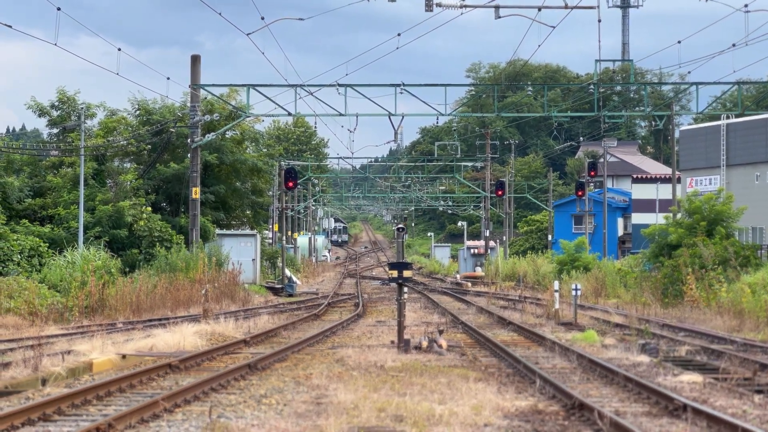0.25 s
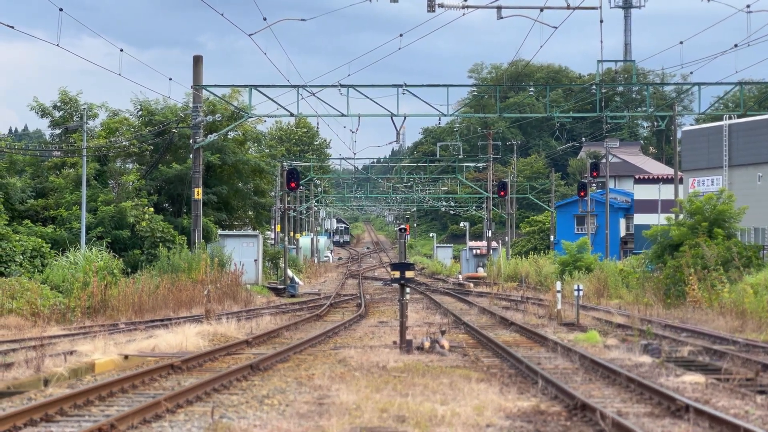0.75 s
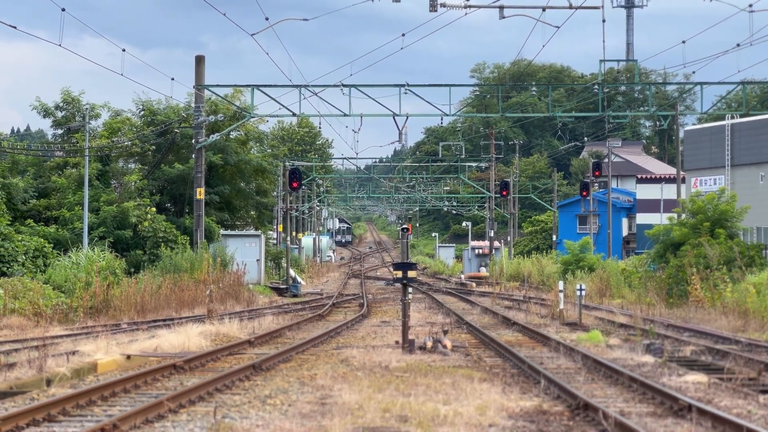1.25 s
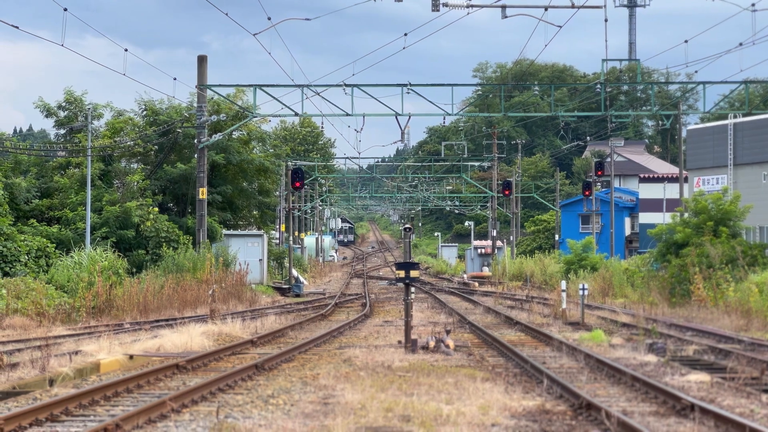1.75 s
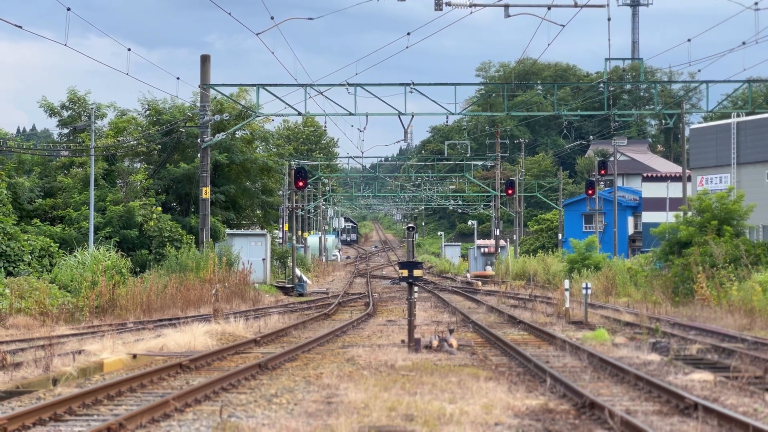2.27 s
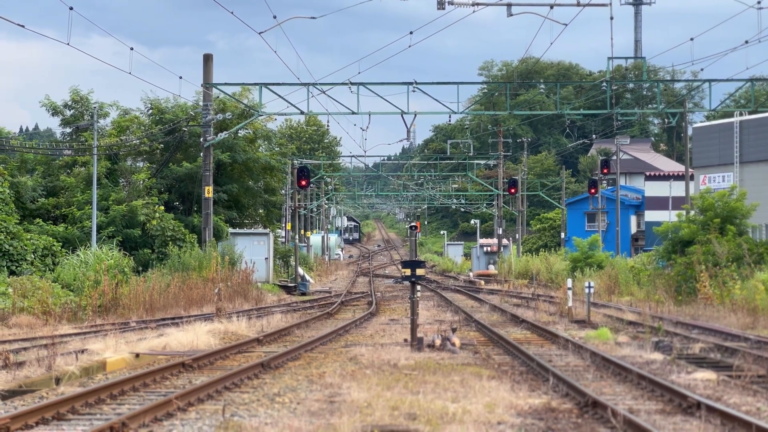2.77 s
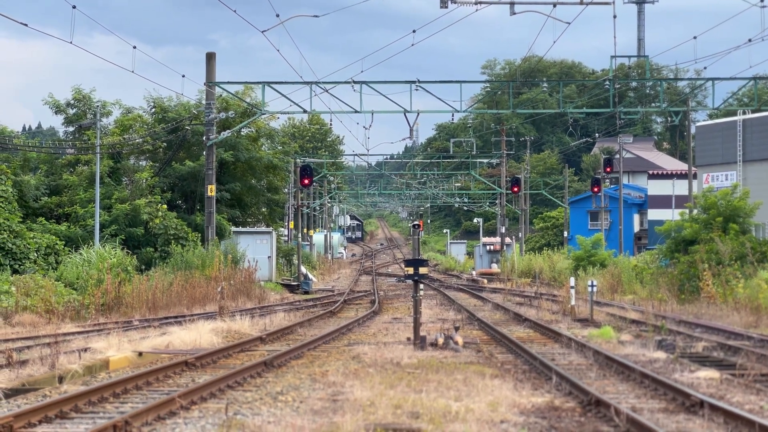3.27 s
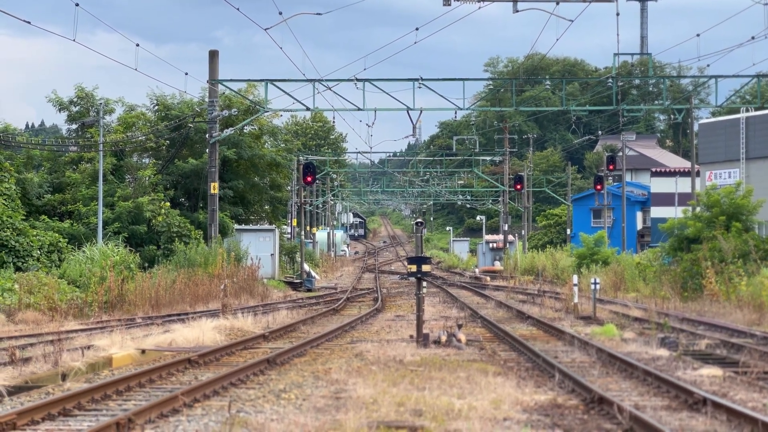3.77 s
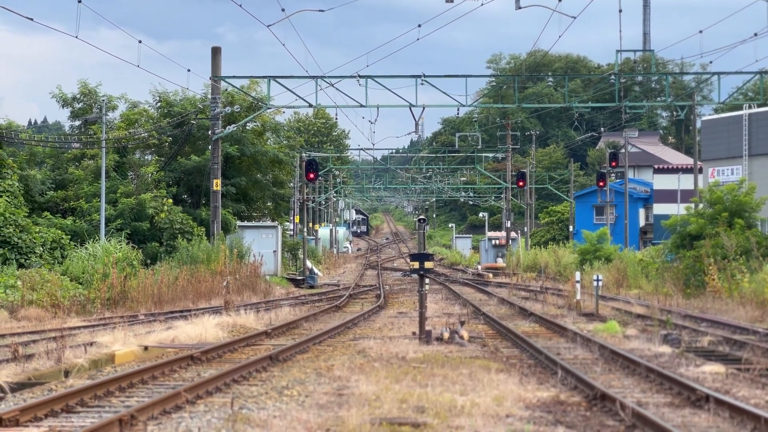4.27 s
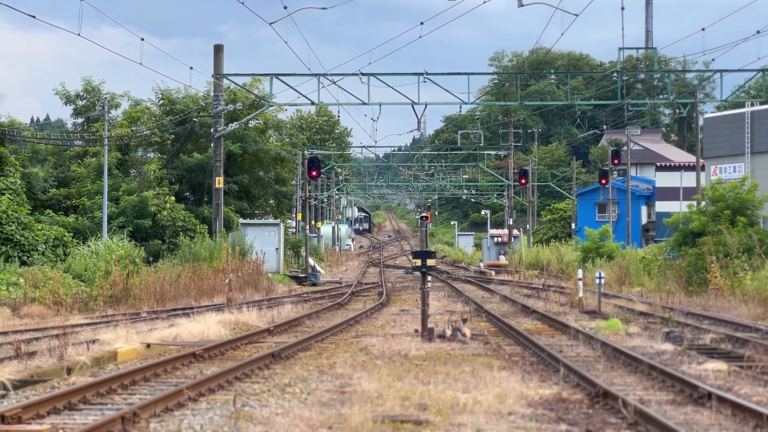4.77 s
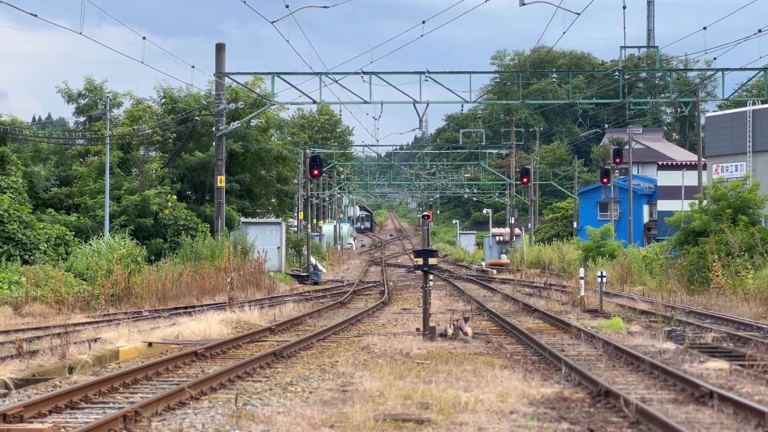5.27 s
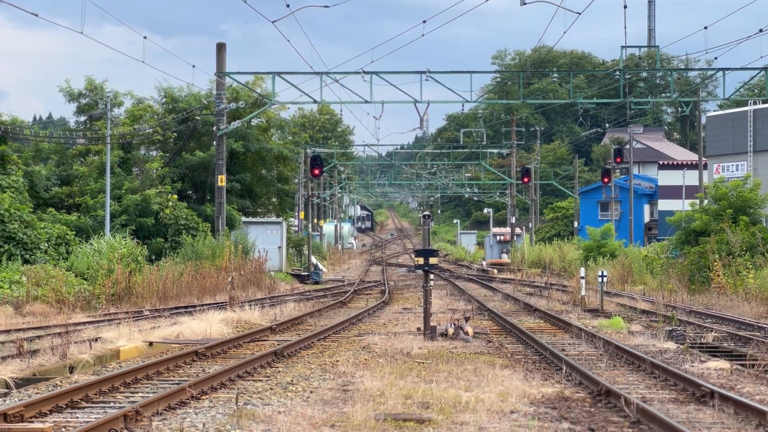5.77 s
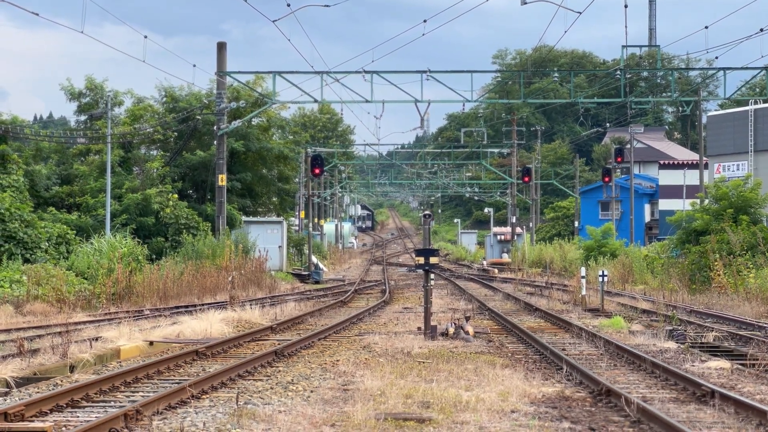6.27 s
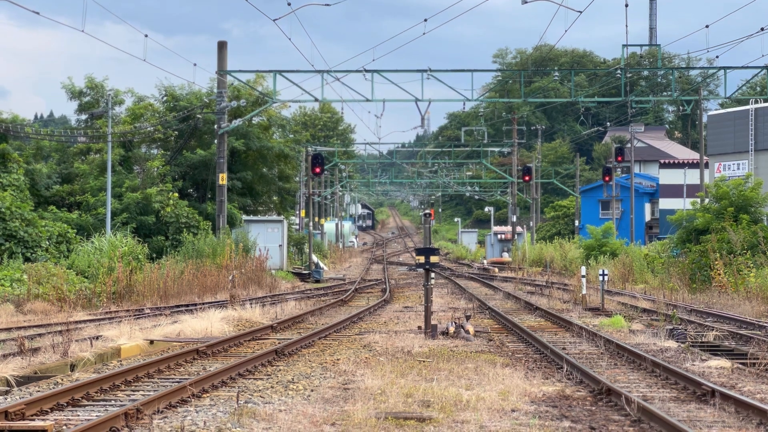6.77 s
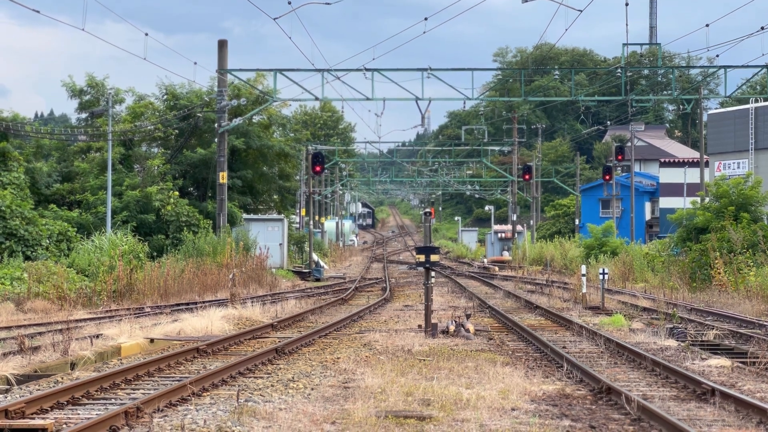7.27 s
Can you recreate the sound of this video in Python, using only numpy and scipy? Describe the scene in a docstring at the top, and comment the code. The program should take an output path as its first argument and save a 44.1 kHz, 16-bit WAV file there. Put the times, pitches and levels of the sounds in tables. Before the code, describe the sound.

Outdoors by railway tracks, a wide, high hiss of massed cicadas carries on throughout, with closer ones buzzing and pulsing in it. Light wind rumble on the microphone swells into three bouts of irregular puffs and low buffeting, with calmer gaps between them. Far behind, traffic and machinery blur into a soft steady roar with a faint hum that comes and goes.

```python
"""Cicadas shrill in the trees around a rail yard, their clicking tymbals ringing their abdomens.
A far chorus merges into a hiss; three singers sit nearer, and a fourth throbs in syllables.
Wind buffets the microphone in gusts and puffs. Distant traffic and machinery, a low hum, crickets
and two faint notes fill the middle. Both channels carry almost the same sound, turned in phase."""
import sys
import numpy as np
from scipy import signal
from scipy.fft import rfft, irfft, next_fast_len
from scipy.io import wavfile

SR = 44100
rng = np.random.default_rng(int(sys.argv[2]) if len(sys.argv) > 2 else 0)


def generate_wav(sig):
    """Save sig (samples, or channels by samples) to the path in sys.argv[1] as 16-bit PCM at SR."""
    pcm = np.round(np.clip(np.atleast_2d(sig).T, -1, 1) * 32767).astype(np.int16)
    wavfile.write(sys.argv[1], SR, pcm)


N = 332052
SIZE = next_fast_len(N)
HZ = np.maximum(np.fft.rfftfreq(SIZE, 1 / SR), 1)

# single eddies hitting the microphone: (time [s], push [dB], tick over push [dB], wake rumble [dB])
WIND_PUFFS = [(.16, -39, -6.5, -51), (0.802, -43, 6.5, -52), (1.088, -52, -2, -46), (2.023, -50, 9.5, -71),
              (2.066, -41, -12.5, -54), (2.352, -30.5, -24, -33.5), (2.403, -43, -28, -36),
              (2.449, -40, -19, -28), (2.544, -44, -34, -26.5), (2.607, -30, -33, -37),
              (2.642, -45, -21, -33), (2.735, -29, -23, -29.5), (2.766, -17.5, -32, -26),
              (2.818, -40, -20, -30.5), (2.88, -47, -15, -32), (2.934, -21.5, -19, -32),
              (3.014, -40.5, -15, -53), (3.079, -33.5, -6, -41), (4.18, -37, -10, -41.5),
              (4.39, -41, -8, -42.5), (4.641, -32, -13, -35.5), (4.859, -28.5, -1, -37.5),
              (4.947, -36, -1.5, -41.5), (4.983, -22.5, -3, -44), (5.012, -24.5, -12, -35),
              (5.04, -49, -5, -45), (5.18, -26, 1, -33.5), (5.226, -22, 0, -37), (5.281, -25.5, 2, -36),
              (5.32, -21, -4, -32), (5.353, -39, 0, -45), (5.466, -28.5, 0, -37.5),
              (5.509, -28, -22, -39.5), (5.54, -40, -6, -35), (5.611, -45, -16, -43),
              (6.135, -49, -16, -49), (6.176, -34, -6, -44), (6.745, -37, -4.5, -47.5),
              (6.819, -45, -10, -42.5), (6.883, -33, -6, -52), (6.941, -41, -13, -58),
              (7.026, -24.5, -6, -29), (7.054, -19, -12, -41), (7.085, -28, -12, -37),
              (7.194, -19.5, -24, -54), (7.2, -20, -7, -26.5), (7.235, -27, 3.5, -36), (7.285, -30, 9, -26),
              (7.343, -25.5, 3, -32), (7.372, -23.5, -2.5, -34), (7.417, -16, -6.5, -42)]


def amp(db):
    """Decibels to gain."""
    return 10 ** (np.asarray(db) / 20)


def rms_one(x):
    """Scale to rms 1."""
    return x / np.sqrt(np.mean(x ** 2) + 1e-20)


def in_time(rows):
    """The value columns of a (time, values...) table at every sample."""
    s, *columns = np.transpose(rows)
    return [np.interp(np.arange(N) / SR, s, c) for c in columns]


def at_hz(points):
    """A (frequency, value) table at every FFT bin."""
    hz, value = np.transpose(points)
    return np.interp(np.log(HZ), np.log(hz), value)


def shaped(x, response):
    """Filter by a frequency response."""
    return irfft(rfft(x, SIZE) * response, SIZE)[..., :N]


def peak(hz, width_hz):
    """Response of a causal resonance, gain 1 on top."""
    return 1 / (1 + 1j * (HZ - hz ** 2 / HZ) / width_hz)


def band(low_hz, high_hz, order):
    """Response of a causal band-pass."""
    sos = signal.butter(order, [low_hz, high_hz], "band", fs=SR, output="sos")
    return signal.sosfreqz(sos, HZ, fs=SR)[1]


def drift(rate_hz):
    """Random wander of rms 1, mostly slower than rate_hz."""
    return rms_one(shaped(rng.standard_normal(N), 1 / (1 + (HZ / rate_hz) ** 2)))


def far_chorus(level_db=-46.5, treble_hz=10500):
    """So many distant cicadas that their clicks merge into a hiss, which swells a little."""
    # spectrum of the massed song: (frequency [Hz], relative density [dB])
    spectrum = [(3000, -22.5), (3600, -28), (4200, -16.5), (4800, -8), (5050, -3.5), (6000, -2.5),
                (7000, -3), (7600, -1), (8200, -4.5), (8800, -7.5), (9400, -7.5), (10000, -16),
                (10500, -19.5), (10900, -18.5), (11500, -13), (12200, -10.5), (13200, -10), (14500, -10),
                (15200, -13), (15900, -12.5)]
    # the treble ebbs toward the end: (time [s], gain above treble_hz [dB])
    treble_ebb = [(0, 0.5), (3.5, 0), (4.1, 0), (5.4, 0.5), (6.3, 0), (7.53, -1.5)]
    hiss = rms_one(shaped(rng.standard_normal(N), amp(at_hz([(2000, -50)] + spectrum))))
    treble_change = shaped(hiss, HZ > treble_hz) * (amp(in_time(treble_ebb)[0]) - 1)
    return amp(level_db + .45 * drift(6.3)) * (hiss + treble_change)


def tymbal_envelope(clicks_per_s, decay):
    """The tymbal buckles at a slightly wandering rate; each click dies away over its cycle."""
    cycle = np.cumsum(clicks_per_s * (1 + .012 * drift(.94))) / SR % 1
    return np.exp(-decay * cycle)


def cicada(song, width_hz, clicks_per_s, decay):
    """Click bursts ring the abdomen: a narrow noise band carried on the song's pitch."""
    hz, level_db = in_time(song)
    bursts = rng.standard_normal((2, N)) * tymbal_envelope(clicks_per_s, decay)
    ring = shaped(bursts, 1 / (1 + (2 * HZ / width_hz) ** 3))
    carrier = np.exp(2j * np.pi * np.cumsum(hz) / SR)
    return amp(level_db) * rms_one(((ring[0] + 1j * ring[1]) * carrier).real)


def near_cicadas(steady_hz=8323):
    """Three singers in the nearer trees: one holds its pitch, one wanders, one rings thinly."""
    # steady singer, fading while the wanderer sings and then returning: (time [s], level [dB])
    steady_levels = [(0, -48.5), (1.3, -50.5), (2.4, -52.5), (3.1, -52.5), (3.45, -49), (4.2, -49),
                     (4.8, -47), (5.5, -49), (7.1, -47), (7.53, -49)]
    # wandering singer: (time [s], pitch [Hz], level [dB])
    wandering_song = [(0, 7800, -56.5), (.35, 7700, -56.5), (.6, 7050, -58), (.9, 7100, -55.5),
                      (1.2, 7200, -62), (1.6, 7300, -58.5), (1.9, 6900, -65), (2.1, 6550, -59),
                      (2.55, 6500, -56.5), (3.2, 6600, -62), (3.35, 6700, -80)]
    # thin ringing singer: (time [s], pitch [Hz], level [dB])
    thin_song = [(0, 5130, -70), (1.5, 5090, -64), (2.2, 5100, -61), (3.6, 5050, -65.5), (7.53, 5090, -64)]
    steady_song = [(s, steady_hz, db) for s, db in steady_levels]
    return (cicada(steady_song, width_hz=1300, clicks_per_s=399, decay=1.3)
            + cicada(wandering_song, width_hz=240, clicks_per_s=510, decay=.6)
            + cicada(thin_song, width_hz=51, clicks_per_s=391, decay=.29))


def syllables(period_s=.061, swell_db=9.5, uneven_s=.003, uneven_db=1):
    """Times and levels of the throbbing cicada's syllables; each phrase grows to its middle and sinks."""
    # phrases of the song: (first syllable [s], syllables [count], peak level [dB])
    phrases = [(-.08, 9, -52.5), (.505, 7, -53), (.985, 8, -52.5), (1.59, 8, -55), (2.23, 9, -52.5),
               (2.778, 3, -54), (3.066, 10, -52), (3.66, 7, -55), (4.26, 8, -53), (4.83, 7, -53.5),
               (5.254, 6, -46), (5.616, 7, -48), (6.045, 2, -56), (6.288, 6, -55), (6.652, 5, -54),
               (7.008, 10, -50.5)]
    rows = [(s + k * period_s, peak_db - swell_db * ((2 * k + 1) / count - 1) ** 2)
            for s, count, peak_db in phrases for k in range(count)]
    return (rows + rng.standard_normal((len(rows), 2)) * [uneven_s, uneven_db]).T


def throbbing_cicada(syllable_s=.044):
    """Each syllable is a run of clicks through the body's resonances that swells and stops short."""
    # body resonances: (frequency [Hz], width [Hz], relative gain [dB])
    resonances = [(5390, 1570, -3.5), (13900, 2900, -2), (15340, 1600, -11), (15600, 2900, -22)]
    s, level_db = syllables()
    heard = (s >= 0) & (s < N / SR)
    starts = np.zeros(N)
    starts[(s[heard] * SR).astype(int)] = amp(level_db[heard])
    progress = np.arange(int(syllable_s * SR)) / (syllable_s * SR)
    envelope = signal.fftconvolve(starts, np.sin(np.pi * progress ** 1.4) ** .4)[:N]
    clicks = rng.standard_normal(N) * tymbal_envelope(clicks_per_s=391, decay=.57)
    body = sum(amp(db) * peak(hz, width_hz) ** 2 for hz, width_hz, db in resonances)
    return envelope * rms_one(shaped(clicks, body))


def wind(lag_hz=131):
    """Eddies roll over the microphone port: lumpy rumble, thumps, a brighter flutter and single puffs."""
    # wind between the puffs: (time [s], rumble [dB], thumps over rumble [dB], flutter over rumble [dB])
    gusts = [(0, -48, -12.5, -18), (2.33, -49.5, -14.5, -14), (2.37, -40, -57, -34), (2.9, -44.5, -29, -33),
             (3.15, -55.5, -12, -7.5), (3.7, -63, -16, -13), (4.2, -46.5, -15.5, -22),
             (4.45, -51, -12.5, -26), (4.56, -52.5, -9, -14), (5.12, -53.5, -15, -14),
             (5.2, -41, -5.5, -14), (5.6, -46.5, -31, -20), (5.75, -57, -18.5, -21.5),
             (6.6, -55.5, -5, -10), (6.95, -46, -8.5, -16), (7.16, -44.5, -12, -25),
             (7.21, -38.5, -6.5, -13.5), (7.53, -35.5, -13.5, -15)]
    rumble_db, thump_db, flutter_db = in_time(gusts)
    lumps_db, swell_db = 2.42 * drift(40), 2 * drift(2.5)
    noise = rng.standard_normal(N)
    level = np.hypot(amp(rumble_db + swell_db), wakes())
    rumble = rms_one(shaped(noise, band(42.2, 106.3, order=2))) * amp(.51 * lumps_db)
    thumps = rms_one(shaped(noise, band(79.4, 261.5, order=3))) * amp(thump_db + lumps_db)
    flutter = rms_one(shaped(noise, band(262, 677, order=2))) * amp(flutter_db + 1.57 * lumps_db)
    buffets = level * (rumble + thumps + flutter) + puffs()
    # the lows come late, so that every buffet sweeps downward
    swept = shaped(buffets, ((lag_hz - 1j * HZ) / (lag_hz + 1j * HZ)) ** 2)
    return signal.sosfilt(signal.butter(4, 720, fs=SR, output="sos"), swept)


def far_machinery(level_db=-58.5):
    """Traffic and machinery across the yard blur into a gently wavering roar."""
    # spectrum of the roar: (frequency [Hz], relative density [dB])
    spectrum = [(88, -3), (150, 3.5), (197, -26.5), (243, -4.5), (1210, -9.5), (1780, -16.5), (2370, -17),
                (2690, -17), (3440, -37.5), (3790, -34), (4000, -28), (5200, -26), (8800, -120)]
    level = amp(level_db + .5 * drift(1.4))
    return level * rms_one(shaped(rng.standard_normal(N), amp(at_hz(spectrum))))


def crickets_and_tones():
    """Far crickets and two faint unsteady tones: narrow noise bands that swell and fade together."""
    # cricket bands: (frequency [Hz], width [Hz], level before the swell [dB])
    crickets = [(2528, 60, -79), (2630, 200, -77), (2735, 70, -79), (2930, 250, -80)]
    # thin tones: (frequency [Hz], width [Hz], level before the swell [dB])
    tones = [(1389.3, 4, -83), (2778.5, 3, -81)]
    # their common swell: (time [s], gain [dB])
    swell = [(0, 1.5), (1, 0), (2, 1.5), (3, 2), (4, 1.5), (5, 0), (5.7, 4), (6.3, 0.5), (7, 2), (7.53, -6)]
    noise = rng.standard_normal(N)
    bands = sum(amp(db) * rms_one(shaped(noise, peak(hz, width_hz) ** 2))
                for hz, width_hz, db in crickets + tones)
    return bands * amp(in_time(swell)[0])


def yard_hum():
    """A low hum from the yard comes and goes, its pitch sliding slightly."""
    # course of the hum: (time [s], pitch [Hz], peak level [dB])
    course = [(0, 199, -65), (2.2, 200.6, -64), (3.1, 196, -72), (3.7, 199, -75), (3.95, 200.6, -60),
              (4.6, 196, -61), (5.6, 200, -77), (7.53, 203.8, -61)]
    hz, level_db = in_time(course)
    return amp(level_db + .6 * drift(2.8)) * np.sin(2 * np.pi * np.cumsum(hz) / SR)


def puffs(push_s=.0039, tick_s=.0027, shiver_s=.00583):
    """Each eddy gives the microphone a rounded push with a tick on its front, then shivers once more."""
    s, push_db, tick_db, _ = np.transpose(WIND_PUFFS)
    at = (s * SR).astype(int)
    polarity, lateness = rng.random((len(s), 2)).T
    pushes, ticks = np.zeros((2, N))
    pushes[at] = amp(push_db) * np.sign(polarity - .5)
    ticks[at] = -pushes[at] * amp(tick_db)
    shiver_at = at + (shiver_s * SR * (1 + lateness)).astype(int)
    ticks[shiver_at] = ticks[at] * amp(-3)
    pressure = signal.fftconvolve(pushes, np.hanning(int(push_s * SR)))[:N]
    pressure += signal.fftconvolve(ticks, np.hanning(int(tick_s * SR)))[:N]
    return shaped(pressure, peak(hz=137, width_hz=660))


def wakes(rise_s=.014, fall_s=.013):
    """Envelope of the rumble that swells and dies behind each puff."""
    s, *_, wake_db = np.transpose(WIND_PUFFS)
    starts, t = np.zeros(N), np.arange(SR // 5) / SR
    starts[(s * SR).astype(int)] = amp(wake_db)
    shape = (1 - np.exp(-t / rise_s)) * np.exp(-t / fall_s)
    return signal.fftconvolve(starts, shape / shape.max())[:N]


def far_notes():
    """Two short soft tones from far off."""
    # the notes: (start [s], length [s], pitch [Hz], peak level [dB])
    notes = [(0.292, 0.086, 1464, -63.5), (0.901, 0.066, 1510, -64)]
    out, t = np.zeros(N), np.arange(N) / SR
    for s, length_s, hz, db in notes:
        arch = np.sin(np.pi * np.clip((t - s) / length_s, 0, 1)) ** .5
        out += amp(db) * arch * np.sin(2 * np.pi * hz * t)
    return out


def stereo_spread(x, spread_s=.02):
    """A slowly drifting, smeared share of the sound is opposite in the two channels, so that they differ in
    some bands."""
    # likeness of the two channels: (frequency [Hz], likeness [0-1])
    likeness = [(30, .95), (450, .93), (750, .35), (1250, .45), (1550, .8), (1900, 1), (4000, 1),
                (4700, .92), (6000, .93), (6330, 1), (7450, 1), (7700, .95), (9200, .92), (9480, 1),
                (10950, 1), (11100, .75), (12700, .85), (13100, 1), (13800, 1), (14400, .85), (15800, .82)]
    alike = at_hz(likeness)
    smear = rfft(rng.standard_normal(int(spread_s * SR)), SIZE)
    drifting = (signal.hilbert(x, SIZE)[:N] * np.exp(3j * drift(2))).real
    side = shaped(drifting, np.sqrt((1 - alike) / 2) * smear / np.abs(smear))
    mid = shaped(x, np.sqrt((1 + alike) / 2))
    return mid + side * [[1], [-1]]


def scene():
    """Cicadas, wind and the distant yard, spread over two channels."""
    cicadas = near_cicadas() + far_chorus() + throbbing_cicada()
    buffets = wind()
    yard = far_machinery() + crickets_and_tones() + yard_hum() + far_notes()
    return stereo_spread(cicadas + buffets + yard)


def record(dry, low_cut_hz=36, high_cut_hz=15750):
    """The two channels are turned against each other in phase, widening the sound; low and high cuts."""
    # phase between the channels: (frequency [Hz], lead of the right channel [rad])
    phase_lead = [(30, .3), (130, .62), (300, .42), (700, .7), (800, -.55), (1050, -.9), (1450, .25),
                  (1800, 0), (4150, 0), (4950, -.48), (5750, .7), (6280, .4), (6330, 0), (7500, 0),
                  (7620, .65), (8400, 1.0), (9400, 2.8), (9500, np.pi), (10950, np.pi), (11050, 4.1),
                  (13000, 5.95), (13150, 2 * np.pi), (13800, 2 * np.pi), (15800, 8.6)]
    half_turn = np.exp(.5j * at_hz(phase_lead))
    stereo = shaped(dry, np.array([half_turn.conj(), half_turn]))
    stereo = signal.sosfilt(signal.butter(4, low_cut_hz, "high", fs=SR, output="sos"), stereo)
    return signal.sosfilt(signal.ellip(14, .5, 60, high_cut_hz, fs=SR, output="sos"), stereo)


dry = scene()
out = record(dry)
generate_wav(out)
```